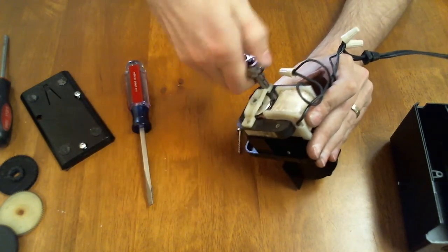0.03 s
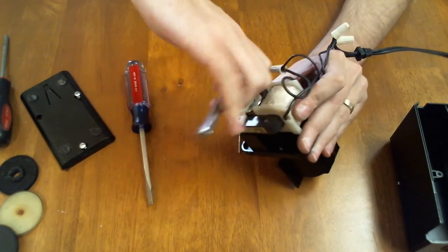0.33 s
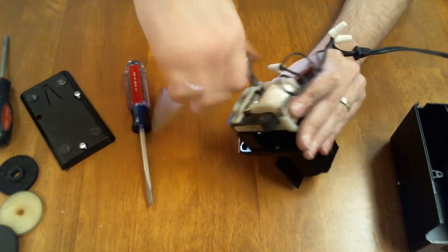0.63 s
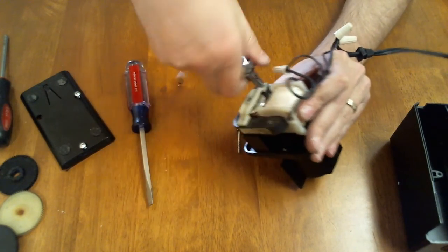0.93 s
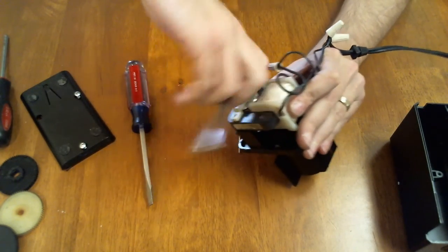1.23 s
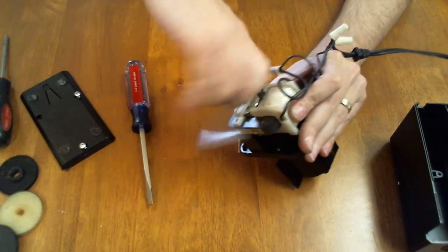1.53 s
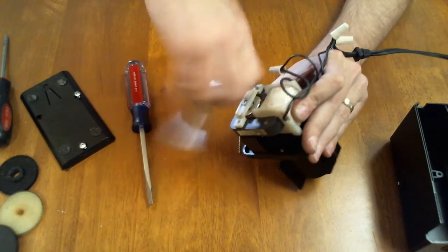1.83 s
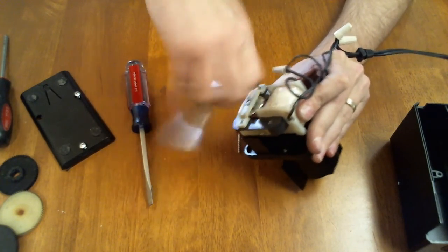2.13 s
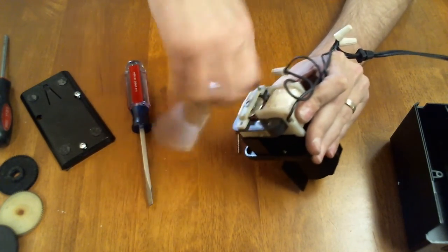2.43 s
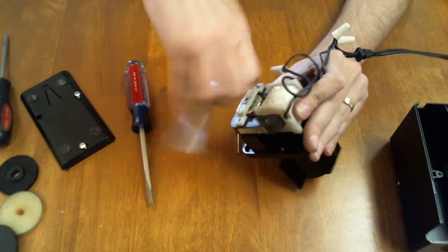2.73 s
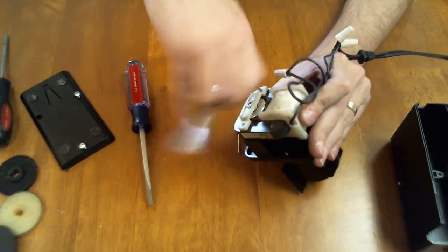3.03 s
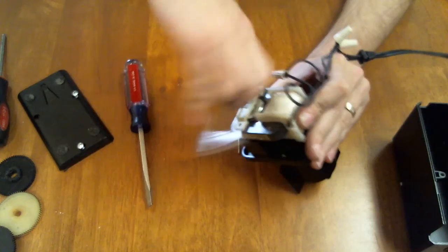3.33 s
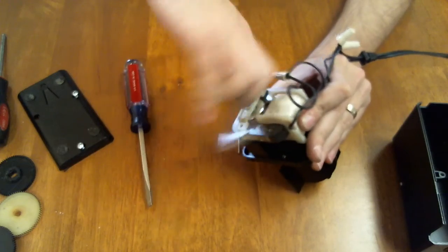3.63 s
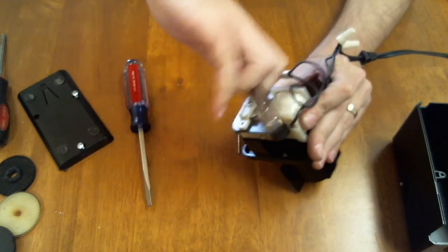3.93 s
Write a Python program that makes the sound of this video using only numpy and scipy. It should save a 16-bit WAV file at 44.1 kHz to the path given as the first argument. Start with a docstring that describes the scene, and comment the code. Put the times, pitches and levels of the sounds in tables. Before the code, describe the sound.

A small geared sharpener turned by hand in quick, metallic ratcheting and grinding bursts.

```python
"""At a wooden table in a small room, a little geared sharpener is turned by hand in twelve quick strokes.
In each stroke the loose drive knocks, a run of teeth snaps past, faster in the middle, and the gears
grind and ring the metal frame. A dry bearing chirps, and the hands bump the housing on the table
over a faint hum. Quiet hiss is gated down, and the sound drops out once."""
import sys
import numpy as np
from scipy import signal
from scipy.fft import rfft, irfft
from scipy.io import wavfile
from scipy.ndimage import uniform_filter1d

SR = 44100
rng = np.random.default_rng(int(sys.argv[2]) if len(sys.argv) > 2 else 0)


def store_pcm(level_fs):
    """Save levels as 16-bit WAV."""
    pcm = np.round(np.clip(level_fs, -1, 1) * 32767).astype(np.int16)
    wavfile.write(sys.argv[1], SR, np.atleast_2d(pcm).T)


N = 176400
CONTACT_RISE_S = 0.00041


def undb(db):
    """Decibels to gain."""
    return 10 ** (np.asarray(db) / 20)


def add(out, start_s, x):
    """Mix x into out from start_s on."""
    i = int(np.clip(start_s * SR, 0, N - 1))
    out[i:i + len(x)] += x[:N - i]


def colour(x, curve):
    """Minimum-phase EQ shaped by (freq_hz, relative_db) points; white noise keeps its level."""
    hz, db = np.array(curve, float).T
    size = 2048
    bins_hz = np.arange(size // 2 + 1) * SR / size
    gain = undb(np.interp(np.log(bins_hz + 1), np.log(hz), db))
    cepstrum = irfft(np.log(gain))
    cepstrum[1:size // 2] *= 2
    cepstrum[size // 2 + 1:] = 0
    impulse = irfft(np.exp(rfft(cepstrum)))
    return signal.fftconvolve(x, impulse / np.linalg.norm(impulse))[:N]


def band(x, hz, width_hz):
    """Band-pass with gain 1 at its centre."""
    low = np.hypot(hz, width_hz / 2) - width_hz / 2
    high = min(low + width_hz, SR / 2 - 1)
    return signal.sosfilt(signal.butter(2, [low, high], "band", fs=SR, output="sos"), x)


def noise_swell(hz, width_hz, rise_s):
    """A band of noise that swells to level 1 and fades."""
    age = np.arange(SR // 4) / SR / rise_s
    noise = band(rng.standard_normal(len(age)), hz, width_hz)
    return age * np.exp(1 - age) * noise / noise.std()


def burst(decay_s, grit_db=0):
    """One contact: a dying spray of tiny impacts with a steady total energy."""
    t = np.arange(1000) / SR
    decay = np.exp(-t / decay_s)
    grit = np.repeat(undb(grit_db * rng.standard_normal(len(t) // 20)), 20)
    spray = decay * (1 - np.exp(-t / CONTACT_RISE_S)) * grit * rng.standard_normal(len(t))
    return spray * np.sqrt(np.sum(decay ** 2) / np.sum(spray ** 2))


def ping(hz, decay_s):
    """A small metal part rings for a few cycles."""
    t = np.arange(SR // 50) / SR
    envelope = np.exp(-t / decay_s) * (1 - np.exp(-t / CONTACT_RISE_S)) ** 2
    return 2 * envelope * np.sin(2 * np.pi * min(hz, SR / 4) * t)


# Tone of the room's air: freq_hz, relative_db
AIR_EQ = [(25, -27), (60, -15), (120, -4), (200, 0), (330, -5.5), (650, -13.5), (1200, -15.5), (2200, -18),
          (4000, -13), (8000, -24.5), (15500, -29)]
# Hum and whine: pitch_hz, level_db
HUM_TONES = [(119.5, -84.5), (5222, -87)]
def room_tone():
    """A bed of low room noise, mains hum and a thin steady whine."""
    t = np.arange(N) / SR
    air = undb(-70.5) * colour(rng.standard_normal(N), AIR_EQ)
    return air + sum(undb(db) * np.sqrt(2) * np.sin(2 * np.pi * hz * t) for hz, db in HUM_TONES)


# Bands of the reverb tail: centre_hz, t60_s, level_db
REVERB_BANDS = [(1405, 0.19, -3), (2320, 0.29, -6.5), (4590, 0.29, -8), (6740, 0.32, -12.5),
                (7500, 0.26, -8)]
def reverb(x):
    """A short diffuse tail from the table and near walls."""
    t = np.arange(SR // 2) / SR
    tail = 0
    for hz, t60, db in REVERB_BANDS:
        envelope = np.exp(-np.log(1000) * t / t60) * (1 - np.exp(-t / 0.0025))
        noise = band(band(rng.standard_normal(len(t)), hz, hz * 0.82), hz, hz * 0.73)
        tail += undb(db) * noise * envelope / np.linalg.norm(envelope)
    return signal.fftconvolve(x, tail)[:N]


# Handling bumps: start_s, pitch_hz, level_db
HAND_BUMPS = [(.49, 143, -65), (.14, 396, -74), (.75, 103, -65), (0.942, 128, -59.5), (1.247, 141, -69.5),
              (1.71, 140, -68), (1.789, 155, -63), (1.929, 163, -62), (2.118, 132, -58.5),
              (2.27, 484, -64.5), (2.319, 123, -60.5), (2.79, 410, -69), (2.991, 387, -66),
              (3.813, 150, -57.5), (3.879, 168, -63), (3.97, 130, -65)]
def hand_bumps():
    """The hands press the housing on the table in soft, dull bumps."""
    out = np.zeros(N)
    for start, hz, db in HAND_BUMPS:
        add(out, start, undb(db) * noise_swell(hz, 0.49 * hz, rise_s=0.018))
    return out


# Landings of the housing: start_s, level_db
HOUSING_THUMPS = [(0.756, -44.5), (2.859, -49.5), (3.829, -58)]
# Their dull tone: freq_hz, relative_db
THUMP_EQ = [(20, -2.5), (120, -3.5), (400, -13), (1000, -3.5), (2000, -38), (15500, -70)]
def housing_thumps():
    """The housing rocks and drops back on the table."""
    hits = np.zeros(N)
    for start, db in HOUSING_THUMPS:
        add(hits, start, undb(db) * burst(decay_s=0.00081))
    return colour(hits, THUMP_EQ)


# Bearing squeaks: start_s, pitch_hz, level_db
BEARING_CHIRPS = [(0.309, 1667, -45.5), (2.225, 1170, -49), (2.805, 1192, -62)]
def bearing_chirps():
    """A dry bearing rubs in short, rough notes."""
    out = np.zeros(N)
    for start, hz, db in BEARING_CHIRPS:
        add(out, start, undb(db) * noise_swell(hz, width_hz=91, rise_s=0.015))
    return out


# Modes of the frame, around which the grip varies: pitch_hz, over_direct_db, t60_s
FRAME_MODES = [(1183, 0, 0.062), (1287, -4, 0.055), (1800, -14, .25), (2397, 6, 0.083), (2450, 10, 0.15),
               (2484, 9, 0.11), (2630, -3, 0.079), (3874, -6.5, 0.027), (4740, -10.5, 0.2), (5810, 0, 0.11),
               (6130, -4.5, 0.079)]
def frame_ring(contacts):
    """The contacts plus the metal frame's ring; the grip nudges each mode in pitch and strength."""
    grip_detune, grip_db = 0.012, 2
    out = contacts.copy()
    for hz, db, t60 in FRAME_MODES:
        shift, strength = rng.uniform(-1.066, 1, 2)
        radius = np.exp(-np.log(1000) / (t60 * SR))
        pole = radius * np.exp(2j * np.pi * hz * (1 + grip_detune * shift) / SR)
        ring = 2 * (1 - radius) * signal.lfilter([1], [1, -pole], contacts).real
        out += undb(db + grip_db * strength) * ring
    return out


# Knocks around the ends of the strokes: start_s, low_db, mid_db, high_db
DRIVE_KNOCKS = [(0.537, -68.5, -57.5, -65.5), (1.146, -76, -56, -65), (1.167, -74, -48.5, -50),
                (1.511, -66, -51.5, -54.5), (1.537, -61, -47.5, -45), (1.836, -42, -46.5, -48),
                (1.87, -49, -38.5, -42.5), (2.157, -64, -52, -40), (2.46, -59, -45.5, -44),
                (2.472, -60, -50, -49), (2.727, -40.5, -39.5, -44.5), (2.741, -51.5, -46, -42.5),
                (3.019, -67, -57, -56), (3.043, -69, -44, -52), (3.299, -62, -54, -51),
                (3.307, -59, -46, -40.5), (3.583, -59, -55.5, -54.5), (3.601, -52.5, -46, -46),
                (3.612, -69, -43, -69), (3.870, -65, -53.5, -52), (0.318, -51.5, -38.5, -36),
                (.833, -55, -47.5, -47.5), (0.906, -52.5, -39, -36.5), (1.677, -55.5, -46.5, -35.5),
                (1.97, -50, -42, -32.5), (1.984, -41, -38, -30.5), (2.28, -47, -41.5, -46),
                (2.297, -40.5, -39.5, -30), (2.587, -48.5, -38.5, -33), (2.87, -48.5, -37, -33),
                (3.151, -48.5, -47, -50), (3.158, -56, -57, -33), (3.411, -51, -44, -28.5),
                (3.435, -49, -43, -42), (3.446, -43.5, -36, -31), (3.716, -47, -45.5, -47),
                (3.733, -54, -48.5, -36), (3.995, -51, -47, -34.5)]
# Their low, mid and high bands: centre_hz, width_hz
DRIVE_BANDS = [(1400, 760), (2600, 1400), (5000, 3380)]
def drive_knocks():
    """The loose drive hits its stops, each time with its own brightness."""
    out = np.zeros(N)
    for k, (hz, width) in enumerate(DRIVE_BANDS):
        hits = np.zeros(N)
        for start, *levels_db in DRIVE_KNOCKS:
            add(hits, start, undb(levels_db[k]) * burst(decay_s=0.0043, grit_db=2.5))
        makeup_gain = np.sqrt(SR / 2 / width)
        out += makeup_gain * band(band(hits, hz, width), hz, 2 * width)
    return out


# Raspy tone of the grind: freq_hz, relative_db
GRIND_EQ = [(100, -43.5), (450, -18), (760, -27), (950, -22.5), (1150, 2.5), (1400, -3), (1750, 1),
            (2100, -2.5), (2450, 2), (2850, 3), (3300, -3), (4000, 5.5), (5800, -1), (8000, -11),
            (10500, -32), (15500, -39)]
def gear_grind(teeth):
    """Just after its snap, each tooth scrapes along the next and chatters twice."""
    scrape, chatter = np.zeros((2, N))
    for start, _, load in teeth:
        add(scrape, start + 0.0018, load * undb(-34.5) * burst(decay_s=0.0058, grit_db=3.5))
        for _ in range(2):
            wait_s = rng.uniform(0, 0.006)
            hz = 3334 * np.exp(0.433 * rng.uniform(-1, 1))
            add(chatter, start + wait_s, load * undb(-39.5) * ping(hz, decay_s=0.0005))
    return colour(scrape, GRIND_EQ) + chatter


# Bright tone of the snaps: freq_hz, relative_db
SNAP_EQ = [(200, -50.5), (800, -45), (1200, -30), (2100, -14), (3300, -0.5), (4500, 3), (6200, 3.5),
           (7200, -1), (8500, -4), (9300, -10), (10300, -10.5), (12500, -18.5), (15500, -33.5)]
def tooth_snaps(teeth):
    """Each tooth snaps past, pings on its own note and rebounds a little more softly."""
    snaps, pings = np.zeros((2, N))
    for start, force, _ in teeth:
        bounce, note = np.clip(rng.standard_normal(2), -2, 2)
        rebound_s = 0.0017 * np.exp(0.3 * bounce)
        hz = 6275 * np.exp(0.18 * note)
        add(snaps, start, force * undb(-29.5) * burst(decay_s=0.0009))
        add(snaps, start + rebound_s, force * undb(-32) * burst(decay_s=0.0009))
        add(pings, start, force * undb(-31.5) * ping(hz, decay_s=0.00062))
    return colour(snaps, SNAP_EQ) + pings


# Hand strokes: start_s, end_s, tooth_count, ease, lean, snap_db, swell_db, grind_db, bite_delay_s
# Ease slows both ends; positive lean slows the start; positive swell favours the mid-stroke snaps.
HAND_STROKES = [(0.2023, 0.3418, 14, 0.2, -0.0024, -6, 0, -7, 0.019),
                (0.6932, 0.7901, 11, 0.05, -0.042, -0.5, 3, -4, .016),
                (1.1974, 1.3001, 14, 0.26, -0.065, -6, -4, -3, 0.0055),
                (1.5584, 1.6505, 14, 0.27, -.03, 3, 6, -1.5, 0.017),
                (1.875, 1.9708, 14, 0.28, -0.15, 6, 7.5, 1.5, 0.0081),
                (2.182, 2.2706, 15, 0.19, 0.017, 3.5, 6.5, -3, 0),
                (2.49, 2.5732, 12, 0.23, -0.088, 2, 5, -2.5, 0.0041),
                (2.7601, 2.8425, 12, 0.18, 0.036, 4.5, 5.5, 3.5, 0.01),
                (3.048, 3.1233, 11, 0.1, -0.0016, 3.5, 7.5, -4, 0),
                (3.331, 3.4077, 12, .14, .16, 6.5, 8.5, -1, 0.0011),
                (3.6158, 3.711, 12, 0.29, -0.088, 2, 4, -5.5, 0),
                (3.889, 3.981, 12, .26, -.07, 9, 10, -4.5, 0)]
def gear_teeth():
    """Each stroke drives a run of snapping, grinding teeth, fastest near its middle."""
    jitter_s, bite_s = 0.0002, 0.0033
    teeth = []
    for start, end, count, ease, lean, snap_db, swell_db, grind_db, bite_delay in HAND_STROKES:
        for turn in np.linspace(0, 1, round(count)):
            late, strong, rough = np.clip(rng.standard_normal(3), -2, 2)
            arc = np.sin(np.pi * turn)
            elapsed = turn + ease * np.sin(2 * np.pi * turn) / (2 * np.pi) + lean * arc / np.pi
            at = start + (end - start) * elapsed + jitter_s * late
            force = undb(snap_db - swell_db * (1.5 - arc) + 1.7 * strong)
            grind_arc = np.sin(np.pi * turn ** 1.12)  # crests just past mid-stroke
            bite = (1 + np.tanh((at - start - bite_delay) / (2 * bite_s))) / 2  # gears take up the load
            load = bite * undb(grind_db - 8 * (1 - grind_arc) + 1.2 * rough)
            teeth.append((at, force, load))
    return tooth_snaps(teeth) + gear_grind(teeth)


def sharpener():
    """The hands shift before each stroke, so the frame and its reflections ring a little differently."""
    grip_lead_s = 0.06
    contacts = gear_teeth() + drive_knocks()
    regrips = [int((stroke[0] - grip_lead_s) * SR) for stroke in HAND_STROKES[1:]]
    out = np.zeros(N)
    for start, end in zip([0] + regrips, regrips + [N]):
        metal = frame_ring(np.pad(contacts[start:end], (0, SR // 2)))
        add(out, start / SR, metal)
        add(out, start / SR, reverb(metal))
    return out


def scene():
    """The sharpener and its handling noise over the room tone, in mono."""
    return (room_tone() + hand_bumps() + housing_thumps() + bearing_chirps() + sharpener())[None]


def hiss_gate(x):
    """A hiss suppressor turns down each treble band when it falls quiet."""
    threshold_db, deepest_cut_db, from_hz = -77.5, -10, 2060
    hz, _, spectrum = signal.stft(x, SR, nperseg=512)
    power = uniform_filter1d(abs(spectrum) ** 2, size=7, axis=-2)  # smooth across frequency
    power = uniform_filter1d(power, size=3, axis=-1)  # then over time
    quiet = 1 / (1 + (power / undb(threshold_db) ** 2) ** 2)
    treble = 1 - 1 / (1 + (hz[:, None] / from_hz) ** 10)
    return signal.istft(spectrum * undb(deepest_cut_db * quiet * treble), SR)[1][..., :N]


def record(dry):
    """Quiet hiss is gated, the sound cuts out for a tenth of a second, and the top is rolled off."""
    mute_start_s, mute_end_s, top_hz = 0.845, 0.948, 15700
    t = np.arange(N) / SR
    live = uniform_filter1d(1. * ((t < mute_start_s) | (t > mute_end_s)), size=64)
    lowpass = signal.ellip(10, 0.2, 70, top_hz, fs=SR, output="sos")
    return signal.sosfilt(lowpass, hiss_gate(dry) * live)


dry = scene()
out = record(dry)
store_pcm(out)
```